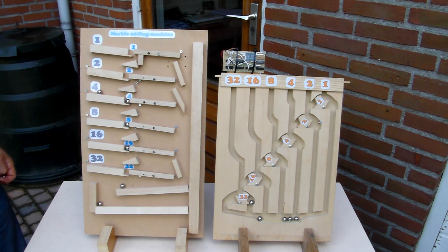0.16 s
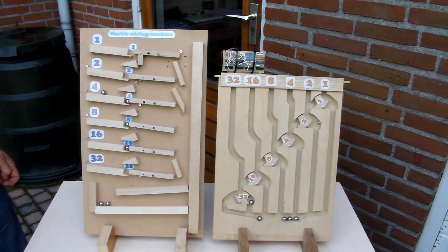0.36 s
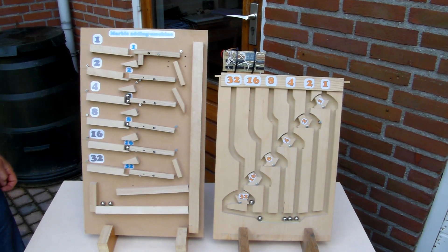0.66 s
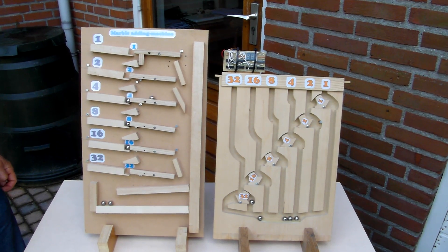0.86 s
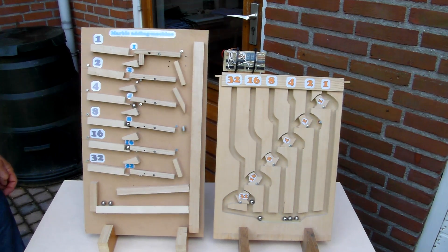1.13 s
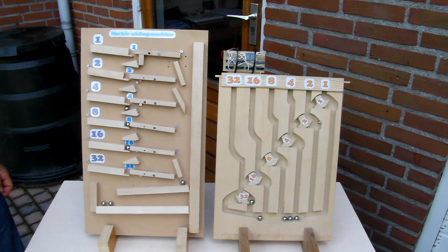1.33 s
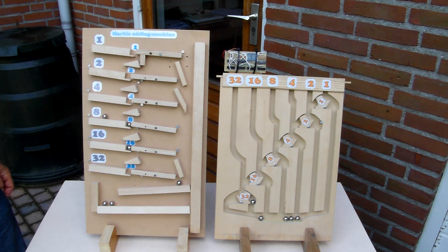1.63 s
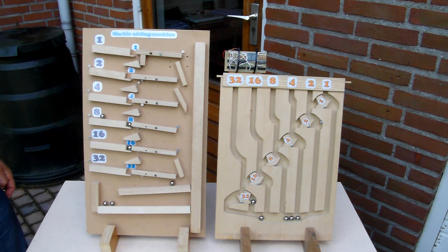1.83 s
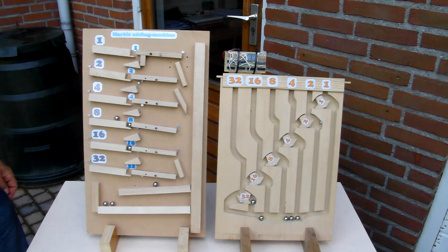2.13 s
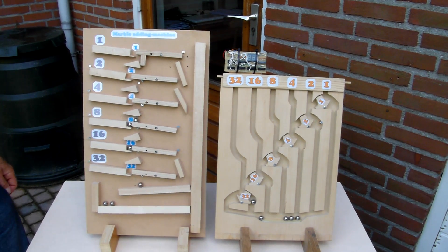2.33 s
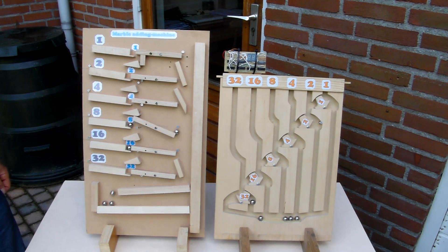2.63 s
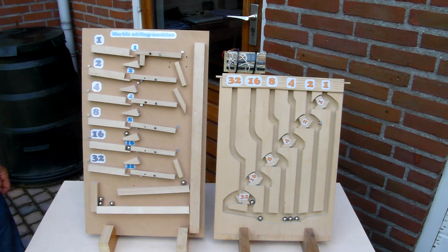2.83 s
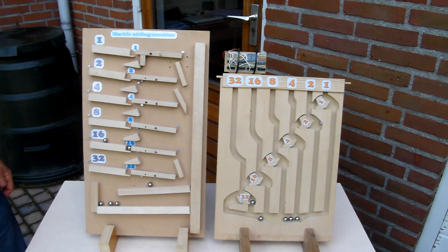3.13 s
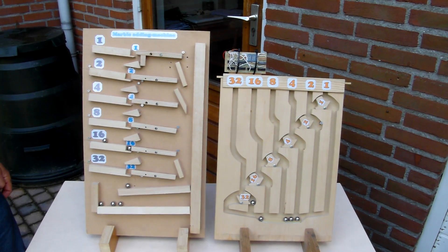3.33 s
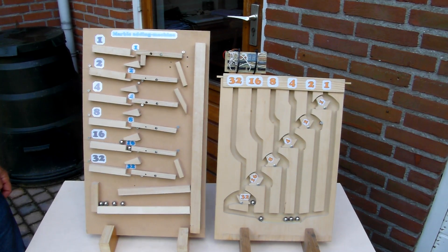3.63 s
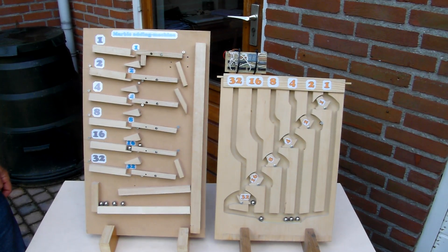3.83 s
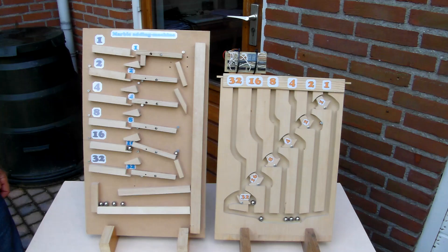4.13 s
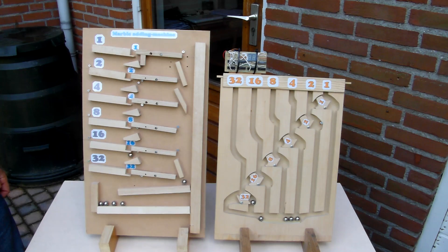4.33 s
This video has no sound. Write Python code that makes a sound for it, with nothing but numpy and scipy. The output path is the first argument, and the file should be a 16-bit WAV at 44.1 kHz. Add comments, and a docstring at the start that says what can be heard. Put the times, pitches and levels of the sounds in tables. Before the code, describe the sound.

Small marbles roll, drop and clack through a wooden contraption outdoors, in short bursts of dry knocks with quiet rolling between.

```python
"""Quiet yard, outdoor table: marbles run through a wooden adding machine while a far bird chirps.
Shaped noise makes the air, swept sines the bird, and a dense stream of dull bumps the rolling along slats.
Knocks, drops, clacks, rocker switches and a bouncing ramp each give a noise crack and a board after-ring,
coloured by wood, contact time and struck spot; clusters of close sines ring on after some blows."""
import sys
import numpy as np
from scipy import signal
from scipy.fft import rfft, irfft
from scipy.io import wavfile
from scipy.ndimage import uniform_filter1d

SR = 44100
rng = np.random.default_rng(int(sys.argv[2]) if len(sys.argv) > 2 else 0)


def log_audio(samples):
    """Write samples as a 16-bit WAV file to the path given in sys.argv[1]."""
    # one column per channel
    frames = np.atleast_2d(samples).T
    # limit to full scale, then quantise
    limited = np.clip(frames, -1, 1)
    pcm = np.round(limited * 32767).astype(np.int16)
    wavfile.write(sys.argv[1], SR, pcm)


N = 197640
TIME_S = np.arange(N) / SR
FULL_HZ = np.fft.rfftfreq(N, 1 / SR)
HIT_SIZE = 16384  # samples kept of each short sound
HIT_TIME_S = np.arange(HIT_SIZE) / SR
HIT_HZ = np.fft.rfftfreq(2 * HIT_SIZE, 1 / SR)
LEFT_RIGHT = np.array([[1], [-1]])


def amp(db):
    """Decibels to gain."""
    return 10 ** (np.asarray(db) / 20)


def along(points, hz):
    """Read (hz, value) points on a log-frequency axis."""
    at_hz, value = np.transpose(points)
    return np.interp(np.log(hz + 1), np.log(at_hz), value)


def decay(t60_s, time_s=HIT_TIME_S):
    """Exponential fall of 60 dB in t60_s."""
    return np.exp(-np.log(1000) * time_s / t60_s)


def coloured(x, points):
    """Shape a full-length signal by (hz, db) points; rms 1."""
    y = irfft(rfft(x) * amp(along(points, FULL_HZ)), N)
    return y / y.std()


def add(out, start_s, sound):
    """Mix a short sound in at start_s."""
    start = max(int(start_s * SR), 0)
    out[:, start:start + HIT_SIZE] += sound[..., :N - start]


def yard(level_db=-61.5):
    """Quiet outdoor air: shaped noise; deep rumble and thin hiss differ between the channels."""
    # mid spectrum: hz, relative_level_db
    air_colour = [(15, -54), (25, -25), (65, -4.5), (114, -7.5), (200, -2), (334, -4.5), (399, -2),
                  (587, -4.5), (720, -4), (980, -3.5), (1200, -9.5), (1300, -14.5), (4230, -23.5),
                  (10600, -25.5), (11500, -26), (15000, -64), (22000, -120)]
    side_db = [(40, -1.5), (120, -2.0), (400, -1.5), (1200, -1.5), (3000, -6.0), (8000, 1.0)]  # re mid
    mid = coloured(rng.standard_normal(N), air_colour)
    side = coloured(rng.standard_normal(N), air_colour)
    side = irfft(rfft(side) * amp(along(side_db, FULL_HZ)), N)
    return amp(level_db) * (mid + LEFT_RIGHT * side)


def bird(waver=0.024):
    """Far bird: faint gliding sine whistles with an unsteady pitch; waver is an rms fraction of pitch."""
    # chirps: start_s, length_s, start_hz, middle_hz, end_hz, level_db
    chirp_table = [(3.482, 0.079, 4220, 4450, 4640, -65), (3.486, 0.054, 2960, 3094, 3210, -70.5),
                   (4.095, 0.082, 4430, 3570, 4400, -57)]
    out = np.zeros((2, N))
    for start_s, length_s, start_hz, middle_hz, end_hz, level_db in chirp_table:
        progress = np.minimum(HIT_TIME_S / length_s, 1)
        glide = np.polyfit([0, .5, 1], [start_hz, middle_hz, end_hz], 2)
        flutter = uniform_filter1d(rng.standard_normal(HIT_SIZE), size=50)
        hz = np.polyval(glide, progress) * (1 + waver * flutter / flutter.std())
        whistle = np.sin(2 * np.pi * np.cumsum(hz) / SR)
        add(out, start_s, amp(level_db) * np.sin(np.pi * progress) ** 2 * whistle)
    return out


def rolling(bumps_per_s=2500, run_up_s=.9, speed_exponent=1.9, fade_t60_s=0.7):
    """Marbles ride over wood grain: dense tiny dull bumps, louder as they gather speed along a slat."""
    # rolls: start_s, end_s, full_speed_level_db
    roll_table = [(-1, 0.073, -47.5), (0.33, 1.6, -51), (1.67, 3.04, -49), (2.5, 3.8, -56.5),
                  (3.5, 4.48, -50)]
    # bump spectrum: hz, relative_level_db
    roll_colour = [(60, -29), (160, -7), (300, -10), (470, 3.5), (620, -7), (950, -2), (1300, -12),
                   (1800, -24.5), (3000, -34), (8000, -45.5)]
    bumps = (rng.random(N) < bumps_per_s / SR) * rng.standard_normal(N)
    power = 0
    for start_s, end_s, level_db in roll_table:
        speed = np.clip((TIME_S - start_s) / run_up_s, 0, 1)
        fade = decay(fade_t60_s, np.maximum(TIME_S - end_s, 0))
        power = power + (amp(level_db) * speed ** speed_exponent * fade) ** 2
    return coloured(bumps, roll_colour) * np.sqrt(power)


def pings(spread=0.039, count=5, rise_s=0.0038):
    """Parts ring on after a blow: clusters of close modes (within +-spread) start together, then beat."""
    # ringing parts, whole panel to small hard pieces, plus a few faint high tones: start_s, pitch_hz, level_db,
    # t60_s
    ping_table = [(.131, 471, -27, 0.12), (.381, 484, -30, 0.16), (1.112, 3210, -30, 0.14),
                  (1.21, 3270, -39, 0.2), (1.306, 166.7, -34.5, 0.15), (1.307, 332, -33, 0.045),
                  (1.335, 5373, -35.5, 0.1), (2.739, 484, -26.5, 0.11), (3.594, 446, -26, 0.12),
                  (3.647, 3530, -50, 0.28), (4.194, 4400, -33.5, 0.13), (4.194, 8240, -53, 0.28)]
    out = np.zeros((2, N))
    for start_s, hz, level_db, t60_s in ping_table:
        detune = spread * (2 * (np.arange(count) + rng.random(count)) / count - 1)
        modes = np.sin(2 * np.pi * np.outer(hz * (1 + detune), HIT_TIME_S))
        cluster = modes.sum(axis=0) / np.sqrt(count)
        envelope = (1 - np.exp(-HIT_TIME_S / rise_s)) * decay(t60_s)
        add(out, start_s, amp(level_db) * cluster * envelope)
    return out


def peaks(modes):
    """Sum of resonance humps in dB, from (hz, width_hz, peak_db)."""
    return sum(db / (1 + (2 * (HIT_HZ - hz) / width_hz) ** 2) for hz, width_hz, db in modes)


def causal(db):
    """Minimum-phase response with this gain: it rings only after the blow."""
    cepstrum = irfft(np.log(amp(db)))
    cepstrum[1:HIT_SIZE] *= 2
    cepstrum[HIT_SIZE + 1:] = 0
    return np.exp(rfft(cepstrum))


def contact(corner_hz, tick_db, steepness=14):
    """Contact time limits the treble, in dB; a hard tick leaks past that corner."""
    return 10 * np.log10(1 / (1 + (HIT_HZ / corner_hz) ** steepness) + amp(tick_db) ** 2)


def board(thump_db):
    """Colour of the wooden board in dB; a square blow moves the whole panel and thumps."""
    # radiation of the wood: hz, gain_db
    radiation = [(40, -26.5), (100, -22), (170, -15.5), (300, -15.5), (400, -6.5), (700, -3.5),
                 (1100, -3.5), (2500, -2.5), (5000, -2), (7000, -10.5), (11000, -25.5)]
    # board resonances: hz, width_hz, peak_db
    board_modes = [(159, 23, 11), (226.3, 22, 9.5), (482, 55, 9.7), (706, 40, 3.2), (1362, 31, 1.4),
                   (2080, 33, 6.14), (2327, 45, 1.7), (2513, 40, 7.5), (2729, 11, 2.2)]
    thump = thump_db / (1 + (HIT_HZ / 750) ** 4)
    return along(radiation, HIT_HZ) + peaks(board_modes) + thump


def spot(low_hz, high_hz, low_db=9, high_db=9):
    """Two broad resonances of the struck slat, in dB."""
    return peaks([(low_hz, 0.23 * low_hz, low_db), (high_hz, 0.22 * high_hz, high_db)])


def crack(t60_s, rise_s=0.00018):
    """Spectrum of the first crowd of bending waves: dies in milliseconds, even across frequency."""
    envelope = (1 - np.exp(-HIT_TIME_S / rise_s)) ** 2 * decay(t60_s)
    waves = rfft(rng.standard_normal(HIT_SIZE) * envelope, 2 * HIT_SIZE)
    return waves / np.sqrt(uniform_filter1d(np.abs(waves) ** 2, size=300))


def board_rings(count=10, build_s=.009, chatter_db=4, chatter_per_s=350):
    """Spectra of after-rings at different spots: banded noise; loose parts chatter, lows last longest."""
    # board decay: hz, t60_s
    ring_decay = [(150, .45), (500, .25), (1200, .21), (2500, .17), (5000, .115), (10000, .13)]
    bands = len(ring_decay)
    centres_hz = np.geomspace(ring_decay[0][0], ring_decay[-1][0], bands)
    steps = (HIT_TIME_S * chatter_per_s).astype(int)
    jumps = np.clip(rng.standard_normal((count, HIT_SIZE)), -2, 2)[:, steps]
    chatter = amp(chatter_db * jumps)
    chatter = chatter / np.sqrt(np.mean(chatter ** 2))
    noise = rfft(rng.standard_normal((count, HIT_SIZE)) * chatter)
    rings = 0
    for hz, own_band in zip(centres_hz, np.eye(bands)):
        band = irfft(noise * along(np.c_[centres_hz, own_band], HIT_HZ[::2]))
        envelope = (1 - np.exp(-HIT_TIME_S / build_s)) * decay(along(ring_decay, hz))
        rings = rings + band * envelope / np.linalg.norm(envelope[HIT_TIME_S < .03])
    return rfft(rings, 2 * HIT_SIZE)


def blow(colour_db, ring_db, crack_t60_s, rings, spot_db=0, spot_share=0.65, ring_top_hz=6000):
    """One impact: a crack, then the board's after-ring, which keeps spot_share of the spot's colour in dB."""
    centre, side = rings[rng.permutation(len(rings))[:2]]
    # short waves reach the channels differently, more so once spread through the board
    crack_width = np.minimum(HIT_HZ / 9000, 1) ** 1.5
    ring_width = np.minimum(HIT_HZ / 5000, 1) ** 1.5
    first = crack(crack_t60_s) + LEFT_RIGHT * crack_width * crack(crack_t60_s)
    # wood soon absorbs the highest treble
    absorption = 0.5 + 0.66 / (1 + (HIT_HZ / ring_top_hz) ** 20)
    after = (centre + LEFT_RIGHT * ring_width * side) * absorption
    first = first * causal(colour_db + spot_db)
    after = after * causal(colour_db + ring_db + spot_share * spot_db)
    return irfft(first + after)[:, :HIT_SIZE]


def bounces(start_s, hop_s, level_db, corner_hz, restitution, loss_db, softening, count):
    """Yield (start_s, level_db, corner_hz) of a blow and its rebounds: each sooner, weaker, duller."""
    for k in range(count):
        yield start_s, level_db - k * loss_db, corner_hz * softening ** k
        start_s = start_s + hop_s
        hop_s = restitution * hop_s + .004  # s added to each later hop


def switches(rings, thump_db=5, tick_db=-23):
    """A rocker switch falls and chatters briefly on its stop: four blows through its resonances."""
    # flips: start_s, first_rebound_s, level_db, contact_corner_hz
    flip_table = [(0.018, 0.032, 1.5, 2380), (0.7371, 0.037, -4, 1440), (2.995, .0578, 6, 3090),
                  (3.7836, 0.027, -6, 1700)]
    # switch resonances: hz, width_hz, peak_db
    switch_modes = [(860, 56, 8.5), (1327, 280, 10), (1528, 420, 16.5), (2660, 270, 13)]
    out = np.zeros((2, N))
    for flip in flip_table:
        rebounds = bounces(*flip, restitution=.48, loss_db=6.0, softening=0.85, count=4)
        for start_s, level_db, corner_hz in rebounds:
            colour_db = level_db + board(thump_db) + contact(corner_hz, tick_db)
            hit = blow(colour_db, ring_db=-6, crack_t60_s=0.024, rings=rings, spot_db=peaks(switch_modes))
            add(out, start_s, hit)
    return out


def ramp(rings, thump_db=7, tick_db=-17):
    """A marble lands on the springy bottom ramp and bounces: seven ever-closer, weaker blows."""
    # ramp resonances: hz, width_hz, peak_db
    ramp_modes = [(880, 110, 16), (1393, 610, 13), (1992, 763, 27.1), (2280, 126, 2.896), (2508, 330, 12.2)]
    out = np.zeros((2, N))
    rebounds = bounces(start_s=1.5224, hop_s=.0716, level_db=-2.5, corner_hz=5400,
                       restitution=.555, loss_db=5.5, softening=0.77, count=7)
    for start_s, level_db, corner_hz in rebounds:
        colour_db = level_db + board(thump_db) + contact(corner_hz, tick_db)
        hit = blow(colour_db, ring_db=-8.0, crack_t60_s=0.018, rings=rings,
                   spot_db=peaks(ramp_modes), spot_share=0.87)
        add(out, start_s, hit)
    return out


def clacks(rings, pitch_db=12, lowest_hz=3500, ring_db=-8, crack_t60_s=.028):
    """Hard glancing contacts, marble on marble or on a pin: so short that they sound in the treble."""
    # clacks: start_s, level_db, pitch_hz
    clack_table = [(0.1305, -17.5, 4280), (0.782, -17, 4150), (1.1135, -7.5, 5100), (1.2089, -18.0, 4770),
                   (1.3046, -2.5, 4800), (1.332, -3.5, 4870), (2.3752, -20.5, 4370), (2.7064, -11, 5040),
                   (2.7383, -7.5, 4000), (2.771, -12, 4230), (3.8477, -9.0, 8500.0),
                   (3.8696, -17.5, 8500.0), (4.1928, -10.5, 4200.0), (4.213, -10, 4200.0),
                   (4.3261, -14, 8000)]
    out = np.zeros((2, N))
    treble_db = board(0) - 10 * np.log10(1 + (lowest_hz / np.maximum(HIT_HZ, 500)) ** 8)
    for start_s, level_db, hz in clack_table:
        pitch = peaks([(hz, 0.22 * hz, pitch_db)])
        add(out, start_s, blow(level_db + treble_db, ring_db, crack_t60_s, rings, pitch))
    return out


def drops(rings, tick_db=-26, ring_db=-7.0, crack_t60_s=0.032):
    """A marble drops on wood and hops twice: three blows on the same spot."""
    # drops: start_s, first_hop_s, level_db, contact_corner_hz, spot_low_hz, spot_high_hz, thump_db
    drop_table = [(0.1307, 0.039, 12.5, 2830, 847, 3730, 2), (0.3823, 0.047, 14, 2650, 532, 3050, -2.5),
                  (0.7926, 0.045, 6.5, 2470, 950, 2410, 2.5), (2.3973, 0.042, 7.5, 2460, 606.5, 2380, -3),
                  (3.5929, 0.052, 16.5, 3230, 825, 2710, 0)]
    out = np.zeros((2, N))
    for first_s, hop_s, first_db, first_hz, low_hz, high_hz, thump_db in drop_table:
        rebounds = bounces(first_s, hop_s, first_db, first_hz,
                           restitution=.47, loss_db=10.5, softening=0.8, count=3)
        for start_s, level_db, corner_hz in rebounds:
            colour_db = level_db + board(thump_db) + contact(corner_hz, tick_db)
            add(out, start_s, blow(colour_db, ring_db, crack_t60_s, rings, spot(low_hz, high_hz)))
    return out


def knocks(rings, tick_db=-26, ring_db=-7.5, ring_slope=0.11, crack_t60_s=.038):
    """Marble knocks a slat or stop, some rows being its rebounds; the harder the blow, the more its crack tops
    the after-ring."""
    # knocks: start_s, level_db, contact_corner_hz, spot_low_hz, spot_high_hz, thump_db
    knock_table = [(.0003, 0.5, 2670, 1250, 1740, 4), (.1448, 5, 2960, 546, 2580, -1.5),
                   (.2212, 5, 2570, 830, 2410, -6), (.376, 12, 2800, 550, 2530, -12),
                   (.398, 1.5, 2850, 1350, 2510, -2.5), (.4161, 1, 2920, 634, 1640, -6.5),
                   (.708, -12, 1090, 660, 1000, -1.5), (.782, -1, 2420, 1600, 2110, 1),
                   (1.104, 9, 1703, 860, 2660, -16), (1.1142, 7, 2900, 1300, 3280, -3),
                   (1.121, 4.5, 3184, 850, 3300, -3), (1.2087, 10, 2870, 880, 2520, -10.5),
                   (1.2656, 7, 3068, 687, 1700, -3), (1.2996, 3.5, 3600, 1600, 2020, -8),
                   (1.3049, 19.5, 4484, 1030, 2640, 1), (1.317, 5, 5105, 710, 2000, -6),
                   (1.333, 11.5, 5000, 1902, 2820, -12), (1.3674, 7.5, 3296, 1010, 3300, 1),
                   (1.388, 0, 2696, 1340, 2500, 7), (1.4307, -4.5, 2170, 1150, 1490, 3),
                   (2.3137, -10, 1100, 536, 900, 7.5), (2.343, -2, 1100, 672, 1790, 0),
                   (2.3762, -6.5, 3100, 1510, 4730, 8.5), (2.6835, 12.5, 1880, 840, 1750, -8.5),
                   (2.7072, 8, 3110, 880, 2500, -1), (2.7386, 12.5, 3220, 1430, 2840, 4.5),
                   (2.7723, 5.5, 2900, 760, 2880, 1), (2.791, 11, 2660, 696, 3300, 3.5),
                   (2.8037, 11.5, 3300, 1730, 2200, -9.5), (2.8453, 5, 2900, 1990, 2250, -3),
                   (2.8648, 7.5, 2950, 1660, 2960, 0.5), (2.8822, 16.5, 2740, 643, 2880, -0.5),
                   (2.9104, 13.5, 3220, 1010, 2560, 3), (2.9262, -0.5, 3300, 1700, 2800, 4),
                   (2.9775, 7.5, 2230, 1060, 2400, -2), (3.0118, 8, 2830, 1310, 3200, 2.5),
                   (3.046, 1, 2400, 1150, 1640, 10), (3.831, -1.5, 1900, 750, 2000, 5.5),
                   (3.8481, -6, 2270, 1630, 2020, 9), (3.8686, -2, 2590, 724, 2050, 0),
                   (4.1676, 12.5, 2050, 956, 2730, 0), (4.1928, 6.5, 3980, 1980, 2460, -4.5),
                   (4.237, 0, 2530, 1330, 3180, 7.5), (4.2576, 3.5, 3500, 1700, 2950, -10),
                   (4.2905, -2, 2190, 1380, 2600, 6), (4.3305, 8, 1990, 1430, 2135, 1),
                   (4.3495, 6, 2550, 720, 1800, 1.5), (4.3792, 6.5, 3030, 940, 2060, 4.5),
                   (4.3871, 14.5, 3070, 1080, 2550, 0.5), (4.409, -1.5, 3370, 560, 2500, 3.5),
                   (4.445, 3.5, 2740, 830, 2020, 0.5), (4.449, 7, 2620, 1110, 2090, -6)]
    out = np.zeros((2, N))
    for start_s, level_db, corner_hz, low_hz, high_hz, thump_db in knock_table:
        colour_db = level_db + board(thump_db) + contact(corner_hz, tick_db)
        hit_ring_db = ring_db - ring_slope * level_db
        add(out, start_s, blow(colour_db, hit_ring_db, crack_t60_s, rings, spot(low_hz, high_hz)))
    return out


def impacts():
    """Every kind of blow sounds through the same board."""
    rings = board_rings()
    return switches(rings) + ramp(rings) + clacks(rings) + drops(rings) + knocks(rings)


def scene(left_lag_s=.000026):
    """Yard and bird behind the machine, whose sound reaches the right channel a moment before the left."""
    background = yard() + bird()
    left, right = rolling() + pings() + impacts()
    left = irfft(rfft(left) * np.exp(-2j * np.pi * FULL_HZ * left_lag_s), N)
    return background + np.array([left, right])


def record(dry, top_hz=11500):
    """Left channel a little weaker in bass and low treble; a steep low-pass cuts the top."""
    # left re right: hz, db
    balance = [(60, -4), (200, -.6), (600, -.2), (2000, -.1), (3800, -2.6), (6500, .2)]
    balance_db = along(balance, FULL_HZ)
    channels = irfft(rfft(dry) * amp(LEFT_RIGHT * balance_db / 2), N)
    low_pass = signal.ellip(10, .2, 70, top_hz, fs=SR, output="sos")
    return signal.sosfilt(low_pass, channels)


dry = scene()
out = record(dry)
log_audio(out)
```